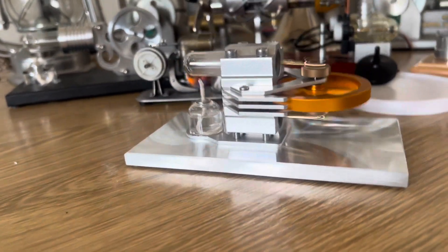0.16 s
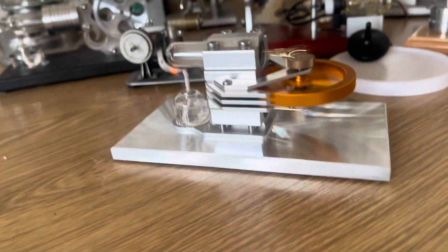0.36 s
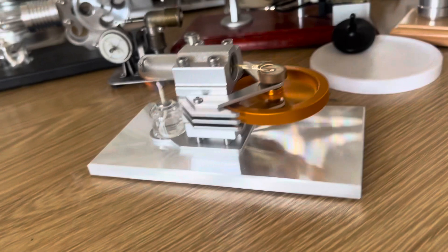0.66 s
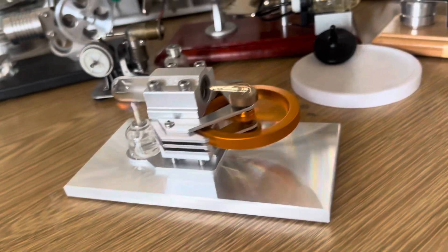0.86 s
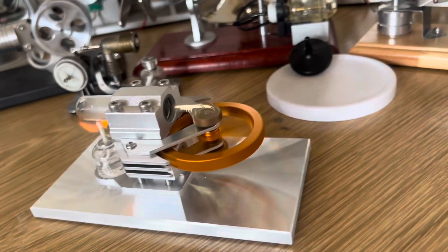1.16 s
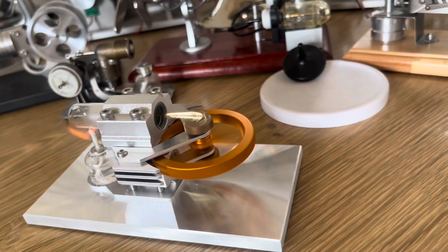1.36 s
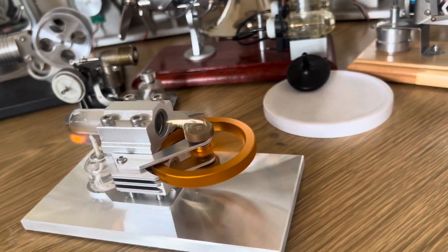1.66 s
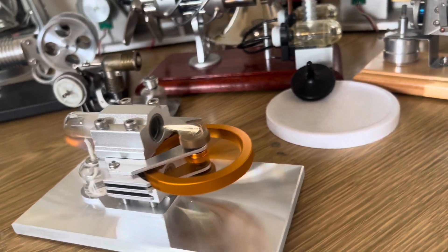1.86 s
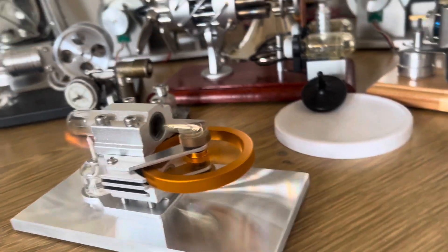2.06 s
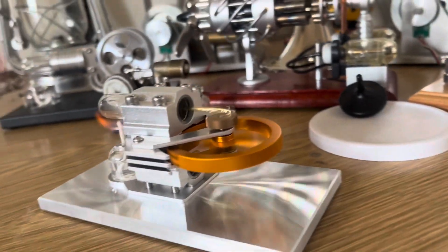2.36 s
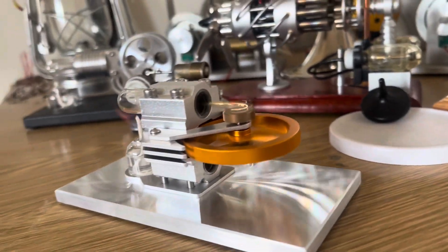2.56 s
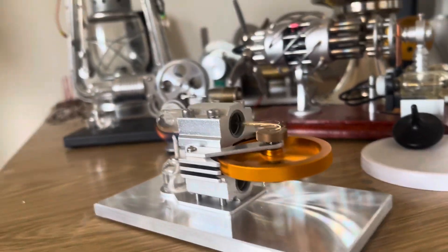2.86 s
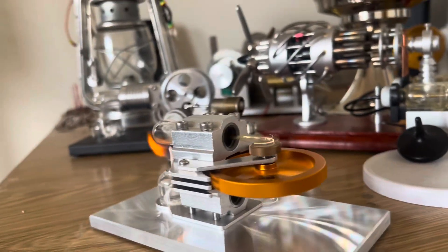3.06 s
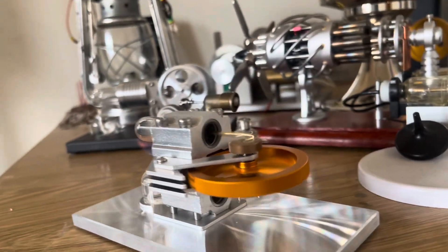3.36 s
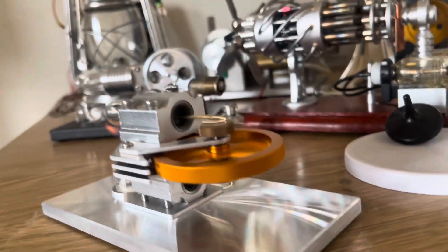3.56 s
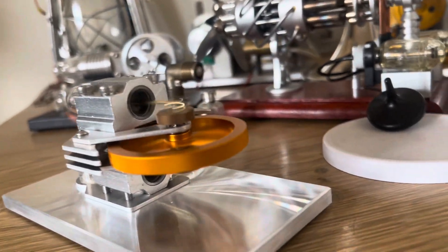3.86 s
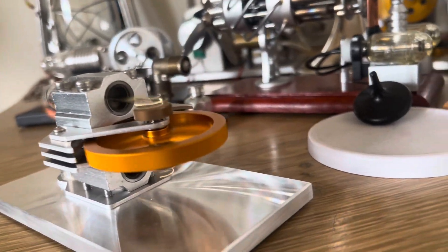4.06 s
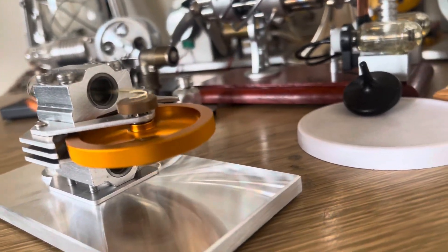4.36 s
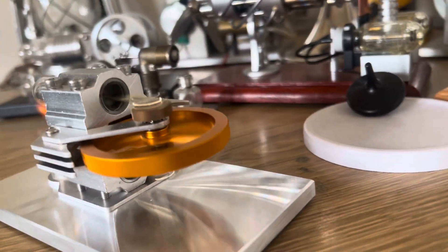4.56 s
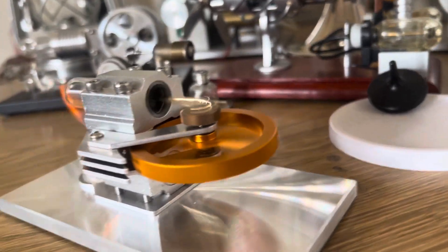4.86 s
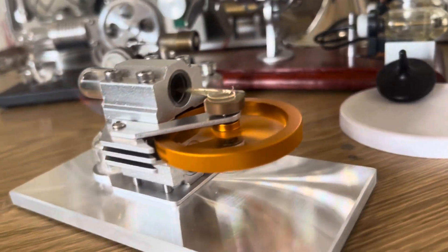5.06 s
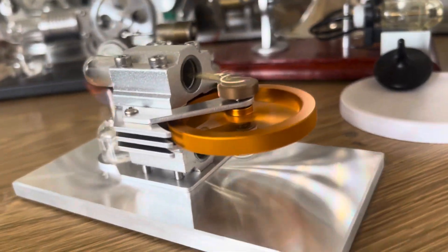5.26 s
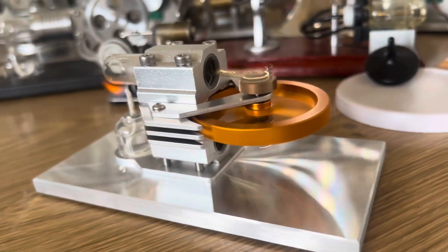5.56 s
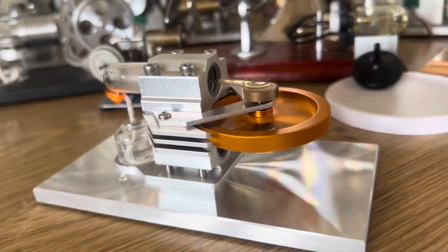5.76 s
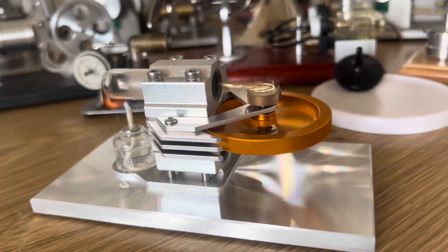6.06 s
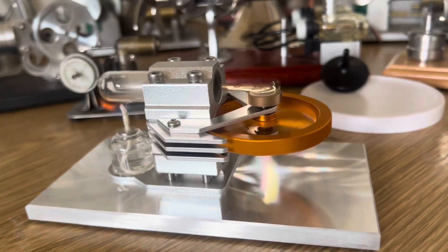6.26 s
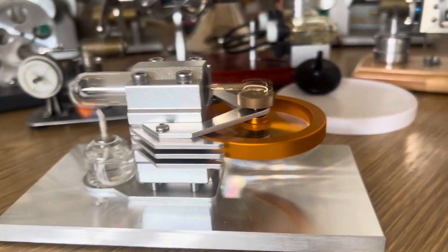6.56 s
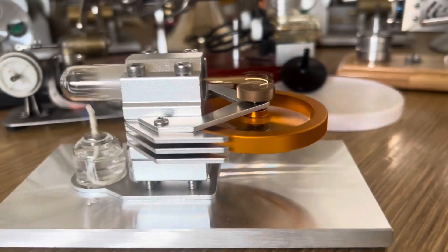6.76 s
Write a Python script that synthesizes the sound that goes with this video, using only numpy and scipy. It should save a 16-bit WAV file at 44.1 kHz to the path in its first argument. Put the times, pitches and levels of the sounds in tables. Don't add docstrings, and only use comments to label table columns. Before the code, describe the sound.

From 0 to about 7 seconds a small hot-air engine runs continuously on a wooden desk, turning about 56 times a second. Five uneven loose-joint knocks per turn blur into a harsh, fluttering metallic buzz, with a low hum and drone from the shaking plate and desk, a purring midrange around 1.6 to 1.8 kHz, and a strong ringing whine near 5 kHz. Gritty piston and bearing rubbing adds a bright, airy hiss. The hand-held phone stays close, moving round it: slightly softer around 1 to 2 seconds, then nearer from 3, with a harder, brighter rod clatter near 4.2 as it faces the cylinder mouth. It is fuller around 5 to 5.5, and nearest at the end. Stereo balance shifts gently; pitch sags only slightly by the finish. A very faint house hum lies underneath; there is no start or stop.

```python
import sys
import numpy as np
from scipy import signal
from scipy.fft import rfft, irfft, next_fast_len
from scipy.io import wavfile
from scipy.ndimage import map_coordinates

SR = 44100
rng = np.random.default_rng(int(sys.argv[2]) if len(sys.argv) > 2 else 0)


def int16_out(signal):
    q = np.round(np.clip(np.atleast_2d(signal).T, -1, 1) * 32767)
    wavfile.write(sys.argv[1], SR, q.astype(np.int16))


def gain_from_db(level_db):
    decades = np.asarray(level_db, float) / 20
    return 10 ** decades


N = 304334
SIZE = next_fast_len(N + 8192)
HZ = np.arange(SIZE // 2 + 1) * SR / SIZE + 1e-3

# pitch_hz, level_db (per Hz)
HOUSE_NOISE = [(30, -9), (60, -10), (120, 1.5), (250, -13), (600, -5), (2000, -22), (8000, -47)]
# pitch_hz, right_lead_radians, direct_share (of power, 0-1)
PORT_PHASE = [(60, -.17, .99), (300, -.05, .92), (600, -.3, .66), (1200, -.72, .9), (2000, -1.9, .76),
              (3600, -2.65, .82), (4800, -6.0, .66), (6000, -6.3, .46), (7500, -5.8, .66),
              (8700, -4.6, .75), (9300, -3.2, .96), (10800, -3.05, .96), (11700, -1.5, .88),
              (12800, -.1, .92), (14100, .2, .9), (15600, 2.6, .7)]
# start_s, nearness_db, view (into the cylinder mouth, 0-1), roll (of the phone, 0-1)
PHONE_PATH = [(0, 0, 0.38, 0.06), (.5, 0, 0.04, 0.16), (1.0, -1, 0.05, 0.58), (1.6, -1.5, 0.17, 0.62),
              (1.9, -0.5, 0.2, 0.55), (2.08, -1, 0.32, 0.44), (2.4, 0.3, 0.28, 0.13), (2.9, 0.5, 0.47, 0),
              (3.4, 2, 0.6, 0.05), (3.75, 1.4, 0.65, 0.68), (4.15, 0.9, .98, 0.87), (4.4, 0.9, 0.76, 0.73),
              (4.62, 1.9, 0.79, .5), (5.0, 2.5, 0.47, 0.38), (5.5, 2.5, 0.3, 0.18), (6.0, 1.7, 0.27, 0.37),
              (6.4, 2, 0, 0.65), (6.9, 3.5, 0.3, 0.86)]
# start_s, speed_turns_per_s
CRANK_SPEED = [
    (0, 56.636),
    (0.9, 56.115),
    (1.9, 55.821),
    (3.5, 56.002),
    (4.9, 56.117),
    (5.9, 55.736),
    (6.91, 55.292),
]
START_TURNS = -.47
# times_crank_speed, level_db; the broken multiples beat with the bearing's ball cage
DESK_TONES = [(1.635, -22), (2, -19), (3, 0), (4, -4.5), (4.635, -21), (5, -7), (5.365, -13.5), (7, -15),
              (9, -10.5), (10, -10.5), (11, -6)]
# times_crank_speed, level_db
FRAME_PURR = [(14, -9), (16, -12), (19, -4.5), (20, -8), (22, -11), (24, -7), (25, -17.5), (26, -13.5),
              (28, -1), (29, -11), (31, 6), (32, -9.5), (35, -2), (37, -3)]
SHAKE_DB, SHAKE_NEAR = -39.5, 1
ROCK_DB, ROCK_AT_FULL_ROLL_DB, ROCK_LEAD = -15.5, 1, 1.1

# angle_turns, desk_db, frame_db, rod_db, pin_db, fins_db
JOINT_KNOCKS = [
    (.08, -4, -11, -21, -8, -6),
    (.24, -6, -15, -26, -4, -13),
    (.4, -2, -13, -5, 1, -5),
    (.615, -3, -6, -8, -10, -9),
    (.75, -8, 0, 0, -6, 0),
]
# pitch_hz, width_hz, level_db
DESK_RING = [(259.7, 41.7, 1.5), (403, 91, -22), (595, 38, -16), (776, 240, -10), (1035, 48, -7)]
FRAME_RING = [(1085, 6.5, -13.5), (1404, 208, -5.5), (1608, 64, 0), (1777, 75, 2.5), (2057, 32, -2),
              (2205, 170, -7)]
ROD_RING = [(2340, 1470, -11.5), (3400, 300, -1), (3653, 222, 3.5), (4004, 890, -3.5)]
PIN_RING = [(4960, 1870, -1), (4984, 236, 8), (5740, 32, 0.5)]
FINS_RING = [(6294, 203, -10.5), (8260, 850, -6.5), (10030, 2800, -12.5), (11710, 620, -2),
             (13100, 1400, -15.5), (14400, 930, -7.5), (15400, 1400, -15.5)]
# click_db, rattle_ms (decay), rub_db, swell_db (of rubbing), slack_ms (in timing), trim_db
PART_DRIVE = [
    (13.7, 4, -7, -3.5, 0.046, -4),
    (21, .4, -6.5, 3.5, .1, -.7),
    (27, .4, -12, 2, .14, 1.2),
    (17.8, 0.34, -4, -1.1, .2, -1.5),
    (16.4, 1.5, -0.5, 3.5, .3, -0.82),
]
KNOCK_SPREAD_DB = [1.5, 1.3, 2.0, 1.8, 3.6]
# level_db, nearness_share, full_view_db, full_roll_db
PART_LOUDNESS = [
    (-36, 1, 3, 1.95),
    (-26.5, 0.24, -2.3, 1.1),
    (-32.5, -.4, 10, -1.5),
    (-34, 0.96, 1.6, 3),
    (-29, 0.65, -2, 1.3),
]
# balance_db, full_view_db, full_roll_db
PART_BALANCE = [
    (0.5, -1.3, 2),
    (-6, 12, 1),
    (-1, 0, 16),
    (21.5, -21.5, 2),
    (1.2, -0.3, -0.7),
]
LAG_US, LAG_AT_FULL_ROLL_US = -51.5, 112


def rms_one(x):
    return x / np.sqrt(np.mean(x ** 2) + 1e-20)


def in_time(rows):
    start_s, *columns = np.transpose(rows)
    return [np.interp(np.arange(N) / SR, start_s, column) for column in columns]


def at_hz(rows):
    pitch_hz, *columns = np.transpose(rows)
    return [np.interp(np.log(HZ), np.log(pitch_hz), column) for column in columns]


def drift(rate):
    points = rng.standard_normal(int(N / SR * 1000) + 3)
    return np.interp(np.arange(N) / SR * min(rate, 999), np.arange(len(points)), points)


def ports(direct, scattered, colour):
    lead, share = at_hz(PORT_PHASE)
    share = np.clip(share, 0, 1)
    phase_step = np.exp(.5j * lead * np.array([[-1], [1]]))
    heard_direct = np.sqrt(share) * phase_step * rfft(direct, SIZE)
    heard_scattered = np.sqrt(1 - share) * rfft(scattered, SIZE)
    return irfft((heard_direct + heard_scattered) * colour, SIZE)[:, :N]


def room_hum(level_db):
    noise = rng.standard_normal((3, N))
    colour = gain_from_db(at_hz(HOUSE_NOISE)[0])
    return gain_from_db(level_db) * rms_one(ports(noise[0], noise[1:], colour))


def crank():
    return START_TURNS + np.cumsum(in_time(CRANK_SPEED)[0]) / SR


def tones(turns, orders, waver):
    wobbles = rng.standard_normal((len(orders), 100))
    place = np.linspace(0, 99, N)
    total = np.zeros(N)
    for (order, level_db), wobble in zip(orders, wobbles):
        strength = gain_from_db(level_db) * (1 + waver * np.interp(place, np.arange(100), wobble))
        total += strength * np.cos(2 * np.pi * order * turns)
    return total


def shake(turns, level_db):
    once = np.cos(2 * np.pi * turns)
    desk = tones(turns - .28, DESK_TONES, waver=0.14)
    frame = tones(turns - .81, FRAME_PURR, waver=0.15)
    return np.sqrt(2) * gain_from_db(level_db) * (once + desk + gain_from_db(-0.7) * frame)


def rocking(turns, level_db):
    rock = np.cos(6 * np.pi * (turns - .28) + ROCK_LEAD)
    return np.sqrt(2) * gain_from_db(level_db) * rock * [[1], [-1]]


def swung(pair, roll):
    lag = (LAG_US + LAG_AT_FULL_ROLL_US * roll) * SR / 10 ** 6
    right = map_coordinates(pair[1], [np.arange(N) - lag], order=2, mode="nearest")
    return np.array([pair[0], right])


def resonances(modes):
    total = 0
    for k, (hz, width, level_db) in enumerate(modes):
        damping = 1j * HZ * width
        total = total + (-1) ** k * gain_from_db(level_db) * damping / (hz ** 2 - HZ ** 2 + damping)
    return total


def knock_times(turns):
    whole = np.arange(np.ceil(turns[0]) - 1, turns[-1] + 1)[:, None]
    at = np.interp(whole + np.array(JOINT_KNOCKS)[:, 0], turns, np.arange(N))
    late, force = rng.standard_normal((2, *at.shape))
    return at, late, force


def part(turns, luck, knock_db, uneven_db, modes, click_db, rattle_ms, rub_db, swell_db, slack_ms):
    at, late, force = luck
    at = np.clip(at + slack_ms / 1000 * SR * late, 0, N - 1).astype(int)
    chance = .6 * force + .7 * rng.standard_normal(at.shape)
    clicks = np.zeros(N)
    clicks[at] = gain_from_db(knock_db + uneven_db * np.clip(chance, -3, 2.1))
    fade = np.exp(-1000 / (max(rattle_ms, .1) * SR))
    rattle = signal.lfilter([1], [1, -fade], clicks + 1e-18)
    stroke = np.cos(2 * np.pi * (turns - .9))
    rubbing = gain_from_db(rub_db + swell_db * stroke + 1.0 * drift(50) + 2.57 * drift(800))
    noise = rng.standard_normal((3, N))
    direct = gain_from_db(click_db) * clicks + (rattle + rubbing) * noise[0]
    burst = gain_from_db(click_db - 20.5) * np.sqrt(1 - fade ** 2) * rattle
    scattered = (burst + rattle + rubbing) * noise[1:]
    return rms_one(ports(rms_one(direct), rms_one(scattered), resonances(modes)))


def scene():
    turns = crank()
    near_db, view, roll = in_time(PHONE_PATH)
    luck = knock_times(turns)
    steady = np.ones(N)
    side = np.array([[.5], [-.5]])
    parts = []
    for k, modes in enumerate((DESK_RING, FRAME_RING, ROD_RING, PIN_RING, FINS_RING)):
        *drive, trim_db = PART_DRIVE[k]
        level_db = trim_db + np.dot(PART_LOUDNESS[k], [steady, near_db, view, roll])
        facing = gain_from_db(np.dot(PART_BALANCE[k], [steady, view, roll]) * side)
        facing = facing / np.sqrt(np.mean(facing ** 2, axis=0))
        knock_db = np.array(JOINT_KNOCKS)[:, k + 1]
        sound = part(turns, luck, knock_db, KNOCK_SPREAD_DB[k], modes, *drive)
        parts.append(sound * gain_from_db(level_db) * facing)
    desk, frame, rod, pin, fins = parts
    shake_db = SHAKE_DB + SHAKE_NEAR * near_db
    crank_hum = ports(shake(turns, shake_db), np.zeros(1), 0.88) * gain_from_db(side)
    plate = rocking(turns, shake_db + ROCK_DB + ROCK_AT_FULL_ROLL_DB * roll)
    return room_hum(-48.0) + crank_hum + plate + desk + swung(frame + rod, roll) + pin + fins


def low_pass(x):
    return signal.sosfilt(signal.butter(12, 16580, fs=SR, output="sos"), x)


def record(dry):
    rounded = .9 * np.tanh(dry / .9)
    top_cut = signal.ellip(12, .5, 60, 15750, fs=SR, output="sos")
    finished = signal.sosfilt(top_cut, rounded)
    return low_pass(finished)


dry = scene()
out = record(dry)
int16_out(out)
```